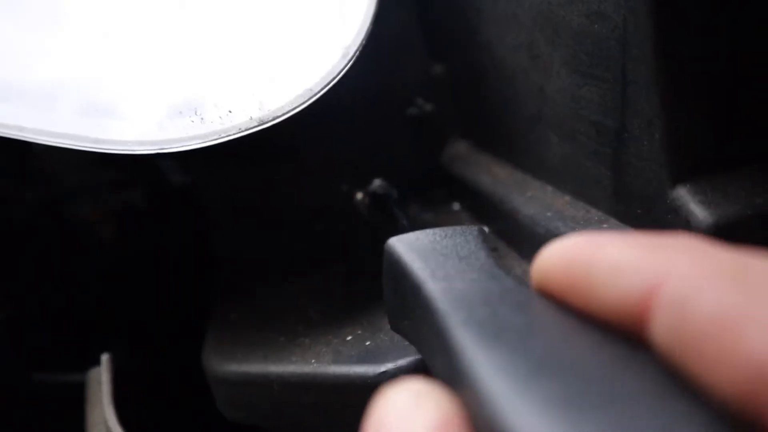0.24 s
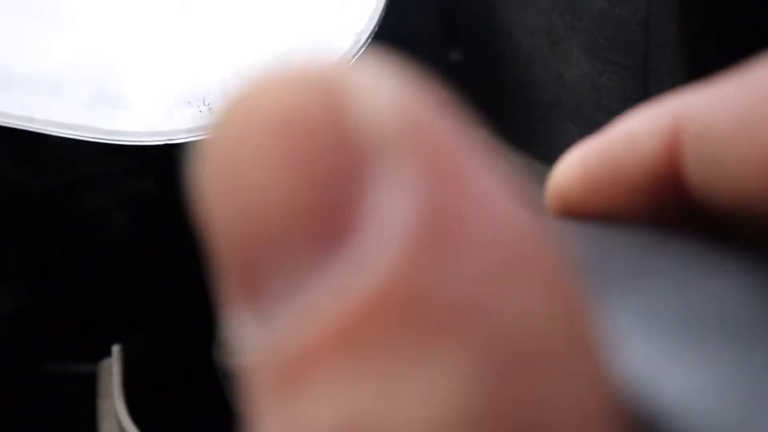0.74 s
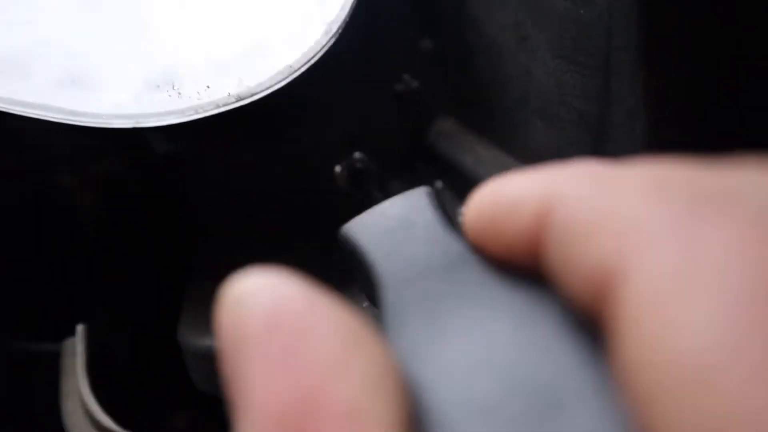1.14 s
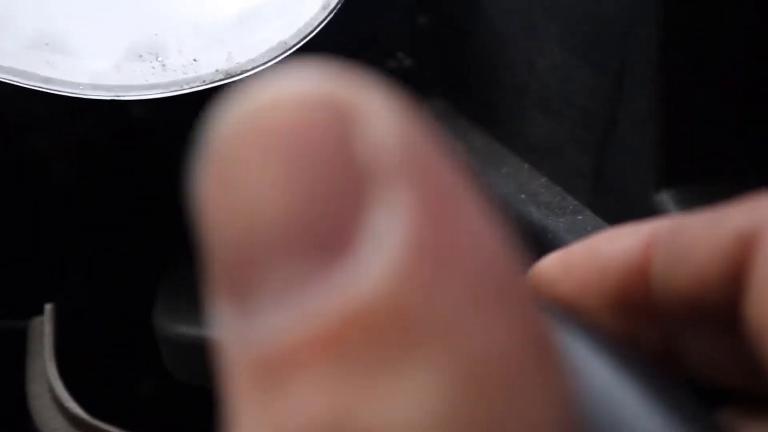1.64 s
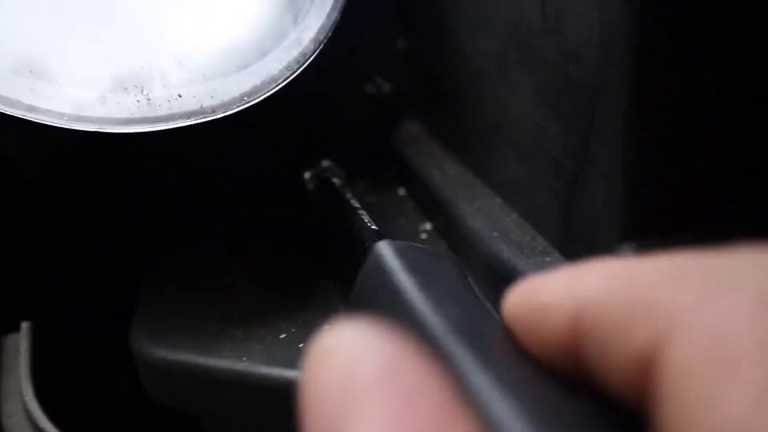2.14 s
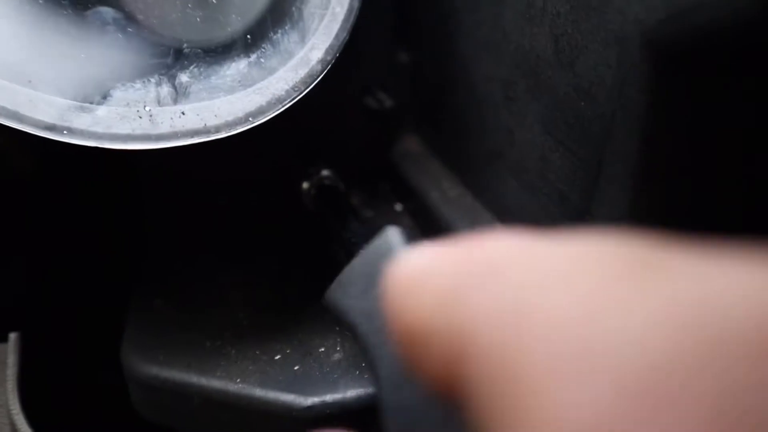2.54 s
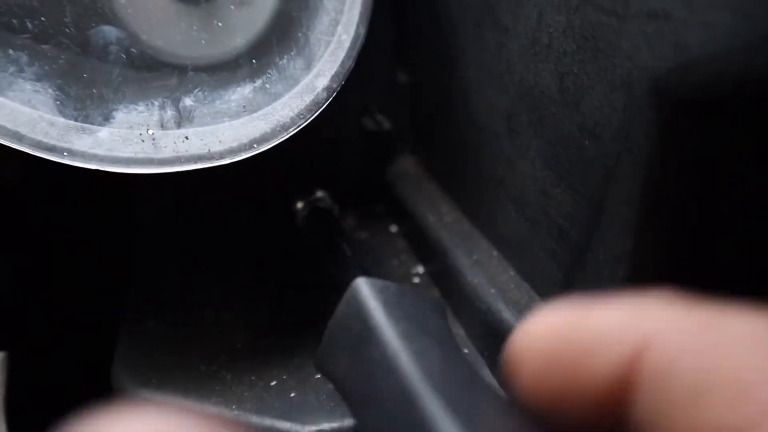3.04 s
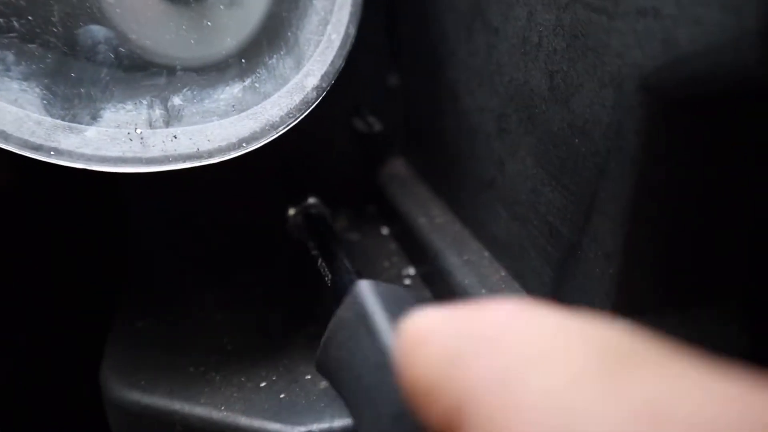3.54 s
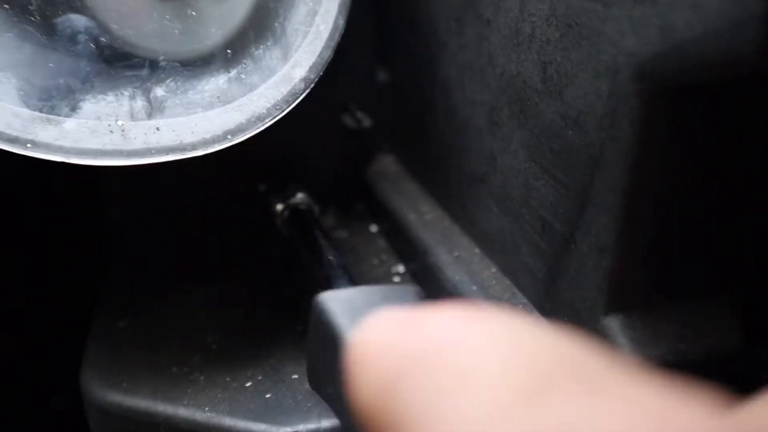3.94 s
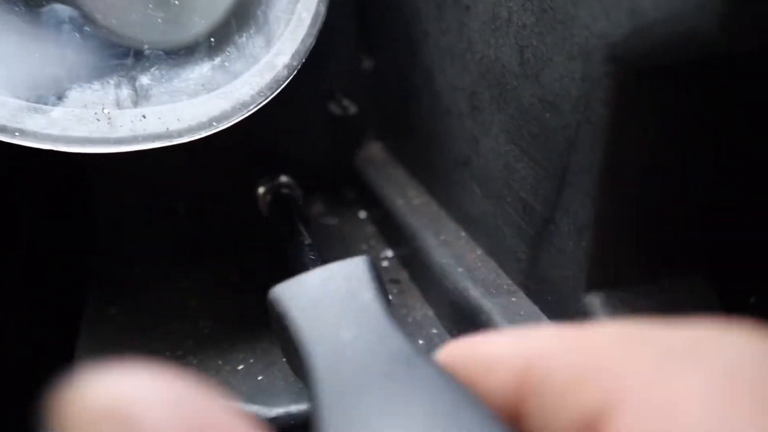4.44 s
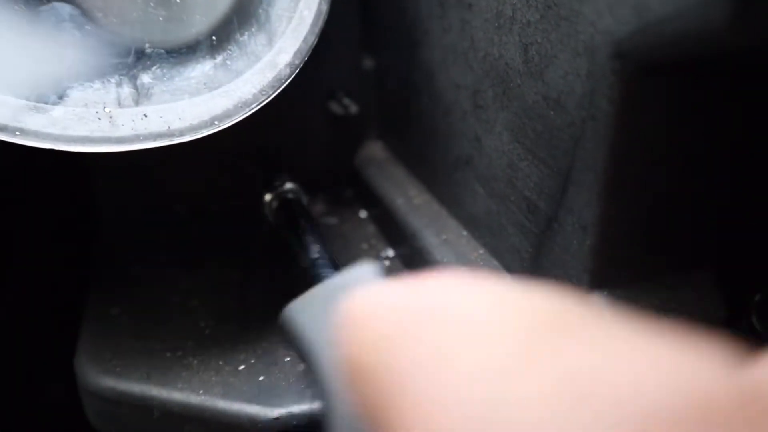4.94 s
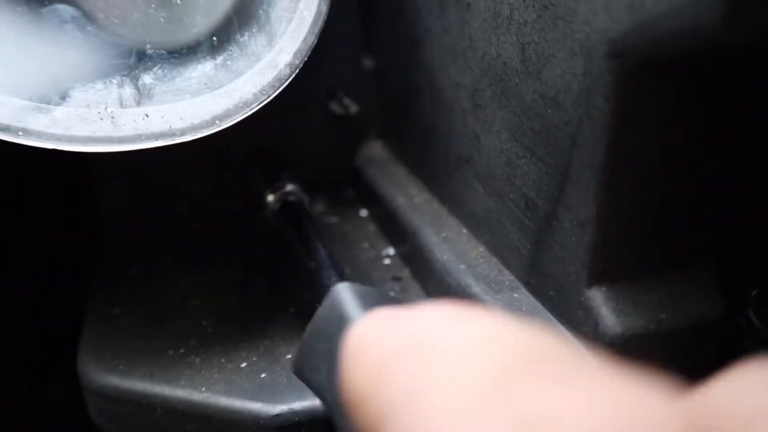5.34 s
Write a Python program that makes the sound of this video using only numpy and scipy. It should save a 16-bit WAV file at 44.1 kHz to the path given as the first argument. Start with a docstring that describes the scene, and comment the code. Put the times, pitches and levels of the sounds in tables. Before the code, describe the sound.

A close, dry pickup inside a small upholstered cabin, with very quiet low-weighted air noise. At 0.1 s a tight cluster of bright plastic snaps sounds, with a barely audible distant hum; another hard clack follows at 0.42 s. It is then nearly quiet until about 1.4 s, apart from soft handling booms and faint gliding bird whistles around 2 kHz, lasting from 1 to 1.7 s. Knocks resume at 1.5 s, with a hollow microphone thump around 1.6 s and a strong, duller clack at 1.97 s. From 2.1 to 4.9 s small clusters of ticks and knocks come several times a second, mixed with short scrapes and woody rubs, notably at 2.44 s. Rumbling grip bumps swell near 2.3 and 4.3 s. A brief scrape at 4.85 s leads to the loudest, sharpest double crack at 4.94-4.97 s. Afterwards only light taps, a little rubbing and low rumble remain until 5.5 s.

```python
"""Prying plastic trim in a parked vehicle

A hand tool works at plastic trim: clips snap, the tool knocks and drags on the panel.
Each blow is a short chatter of contacts ringing the panel's modes, plus a bright crack of filtered grit.
Drag strokes scrape and rub the same panel; handling thumps the microphone with rumble and boom.
A harmonic hum and whistled bird notes come in from outside, over a bed of shaped noise."""
import sys
import numpy as np
from scipy import signal
from scipy.fft import rfft, irfft
from scipy.io import wavfile

SR = 44100
rng = np.random.default_rng(int(sys.argv[2]) if len(sys.argv) > 2 else 0)


def to_wav(s):
    """Save 16-bit WAV."""
    ch = np.atleast_2d(s).T  # columns
    pcm = np.round(np.clip(ch, -1, 1) * 32767)  # PCM
    wavfile.write(sys.argv[1], SR, pcm.astype(np.int16))


N = 247401

# blows on the trim: (time [s], relative level [dB], hardness [dB]); hardness 0 a sharp tick, -20 a soft push
TRIM_BLOWS = [(0.094, -26, -0.5), (0.114, -30.5, -2.5), (0.119, -32.5, -1), (0.399, -53, -12),
              (0.414, -30, -9.5), (0.43, -22.5, -1), (0.57, -49, -10.5), (0.628, -53.5, -23.5),
              (1.114, -55.5, -15), (1.294, -64.5, -6), (1.456, -43.5, -7), (1.48, -41.5, -5),
              (1.492, -37.5, -7.5), (1.517, -29.5, -16), (1.626, -49.5, -16), (1.642, -47, -15),
              (1.705, -37.5, -7), (1.727, -43, -3.5), (1.923, -56, -7), (1.936, -34, -6), (1.951, -36, -16),
              (1.975, -22.5, -8.5), (2.017, -53, -5.5), (2.077, -46.5, -8.5), (2.098, -34.5, -6),
              (2.162, -40.5, -5), (2.288, -33, -3), (2.297, -32, 0), (2.312, -32, -4), (2.445, -37.5, -9),
              (2.47, -39, -7.5), (2.62, -41, -3.5), (2.628, -40.5, -7), (2.639, -35, -2), (2.772, -36, -1),
              (2.851, -32.5, -8.5), (2.939, -37, -9.5), (2.953, -42, -7.5), (2.968, -35.5, -4.5),
              (2.993, -33, -6), (3.112, -40.5, -0.5), (3.125, -39.5, -2.5), (3.296, -37, -3.5),
              (3.312, -33, -6.5), (3.442, -45, -7), (3.468, -58, -17), (3.51, -42.5, -1.5),
              (3.624, -53, -10.5), (3.643, -40, -10.5), (3.654, -39, 0), (3.694, -35, -4),
              (3.771, -41, -2.5), (3.791, -38, -7.5), (3.978, -40.5, -2), (4.008, -44, -1),
              (4.017, -36.5, -1.5), (4.042, -45.5, -23), (4.126, -42.5, 2), (4.165, -39, -1.5),
              (4.19, -44, -18), (4.283, -46.5, -15), (4.298, -45, -15), (4.326, -46.5, -5.5),
              (4.46, -42, -18), (4.468, -38.5, -3), (4.578, -45.5, -1), (4.614, -44.5, -11.5),
              (4.664, -44.5, -19), (4.68, -50, -7.5), (4.7, -40.5, -5), (4.704, -42, -2),
              (4.716, -43, -2.5), (4.73, -37, -27), (4.798, -61.5, 0.5), (4.827, -45.5, -10),
              (4.846, -37.5, -2), (4.856, -38, -6.5), (4.876, -40.5, -5.5), (4.94, -23, 3),
              (4.952, -30.5, -1), (4.9639, -20.5, 1.5), (5.045, -50.5, 0), (5.054, -42, -0.5),
              (5.252, -54.5, -8.5), (5.263, -40.5, -5), (5.311, -59, 5), (5.469, -55.5, -18.5),
              (5.502, -58, 2), (5.515, -47.5, 2)]
BLOW_TIMES_S = np.array(TRIM_BLOWS)[:, 0]
CONTACT_RISE_S, THUD_T60_S, KNOCK_T60_S, CRACK_T60_S = 0.0012, 0.035, 0.042, 0.031


def amp(db):
    """dB to gain."""
    return 10 ** (np.asarray(db) / 20)


def rms_one(x):
    """Scale to rms 1."""
    return x / np.sqrt(np.mean(x ** 2) + 1e-20)


def in_time(rows):
    """Columns of a curve table, one value a sample."""
    s, *columns = np.transpose(rows)
    return [np.interp(np.arange(N) / SR, s, c) for c in columns]


def coloured(x, spectrum):
    """Minimum-phase filter from (Hz, dB) points, unit power gain on white noise."""
    hz, level_db = np.transpose(spectrum)
    grid_hz = np.linspace(1, SR / 2, 4097)
    gain = amp(np.interp(np.log(grid_hz), np.log(hz), level_db))
    cepstrum = irfft(np.log(gain / np.sqrt(np.mean(gain ** 2))))
    # fold onto positive time: minimum phase
    cepstrum[1:4096] *= 2
    cepstrum[4097:] = 0
    impulse = irfft(np.exp(rfft(cepstrum)))
    return signal.fftconvolve(x, impulse)[:N]


def low_pass(x, hz):
    """Fourth-order low-pass."""
    return signal.sosfilt(signal.butter(4, hz, fs=SR, output="sos"), x)


def resonance(x, hz, width_hz):
    """Two-pole band-pass with gain 1 on top."""
    r = np.exp(-np.pi * width_hz / SR)
    b = np.array([1, 0, -1]) * (1 - r * r) / 2
    a = [1, -2 * r * np.cos(2 * np.pi * hz / SR), r * r]
    return signal.lfilter(b, a, x)


def grit(per_s, spread_db):
    """Random contacts of uneven size and sign; rms 1."""
    sizes = amp(spread_db * np.minimum(rng.exponential(1, N), 4)) * rng.choice([-1, 1], N)
    return rms_one(sizes * (rng.random(N) < per_s / SR))


def swells(rows, rise_share):
    """One envelope for each dB column: bell-shaped swells, rise / fall = rise_share, -14 dB at each end."""
    t = np.arange(N) / SR
    out = np.zeros((len(rows[0]) - 2, N))
    for s, half, *levels_db in rows:
        rise, fall = half * np.sqrt(rise_share), half / np.sqrt(rise_share)
        near = slice(max(round((s - 3 * rise) * SR), 0), round((s + 3 * fall) * SR))
        bell_db = -14.0 * ((t[near] - s) / np.where(t[near] < s, rise, fall)) ** 2
        out[:, near] += amp(np.add.outer(levels_db, bell_db))
    return out


def air():
    """Steady noise bed, strongest in the lows."""
    # (frequency [Hz], relative density [dB])
    air_curve = [(12, -22.5), (20, 13.5), (51, -30), (174, -8), (500, -14.5), (1500, -23.5), (2500, -28),
                 (6000, -36), (12500, -39.5), (14000, -64.5)]
    rms_db = -68.5
    return amp(rms_db) * coloured(rng.standard_normal(N), air_curve)


def hum():
    """Faint far harmonic tone: it swells briefly, fades, and ends lower in pitch."""
    # (time [s], fundamental [Hz], relative level [dB])
    hum_course = [(0, 149.8, -79), (.2, 146.5, -68), (.33, 148.6, -77), (.42, 142, -97)]
    # (multiple of the fundamental [1], relative level [dB])
    hum_orders = [(1, -3), (2, -5), (3, 0), (4, -10), (6, -3), (12, -20)]
    hz, level_db = in_time(hum_course)
    phase = 2 * np.pi * np.cumsum(hz) / SR
    harmonics = sum(amp(db) * np.sin(k * phase + k * k) for k, db in hum_orders)
    return amp(level_db) * harmonics


def handling():
    """Grip changes shake the microphone: lumpy rumble and a hollow boom."""
    # (peak time [s], mean of rise and fall [s], rumble level [dB], boom level [dB])
    grip_changes = [(.15, 0.056, -79, -56.5), (.5, 0.088, -76.5, -59), (.72, 0.18, -67, -66),
                    (1.11, 0.075, -61, -56), (1.5, 0.052, -55.5, -50), (1.63, 0.061, -57, -42),
                    (1.76, 0.022, -56, -58.5), (2.1, 0.097, -60, -48), (2.32, 0.17, -52, -66),
                    (3.01, 0.12, -63, -65), (3.88, 0.16, -56.5, -72), (4.24, 0.091, -59, -51),
                    (4.315, 0.046, -48.5, -48), (4.4, 0.15, -53.5, -64), (4.98, 0.028, -46, -76),
                    (5.1, 0.12, -55, -61), (5.3, .09, -54, -62.5)]
    grip_rumble_db, grip_boom_db = -66.5, -85   # the hand never holds quite still
    boom_hz, boom_width_hz = 112, 26
    bump, thump = swells(grip_changes, rise_share=1.6)
    rumble_band = signal.butter(2, [14, 65], "band", fs=SR, output="sos")
    rumble = signal.sosfilt(rumble_band, rng.standard_normal(N))
    boom = low_pass(resonance(grit(790, 3.7), boom_hz, boom_width_hz), 220)
    rumble_gain = bump + amp(grip_rumble_db)
    boom_gain = thump + amp(grip_boom_db)
    return rumble_gain * rms_one(rumble) + boom_gain * rms_one(boom)


def chatter(levels_db, rise_s, t60_s):
    """Envelope of all blows: a quick rise, then the contacts die away."""
    out = np.full(N + SR, 1e-9)
    t = np.arange(SR // 8) / SR
    shape = amp(-60 * t / t60_s) * np.minimum(t / rise_s, 1)
    for s, level_db in zip(BLOW_TIMES_S, levels_db):
        out[round(s * SR):][:len(t)] += amp(level_db) * shape
    return out[:N]


def pushes(levels_db):
    """One firm push near the start of each blow: a single click."""
    push_db, push_lag_s = 16, .002   # dB added to the blow level
    out = np.zeros(N)
    out[((BLOW_TIMES_S + push_lag_s) * SR).astype(int)] = -amp(levels_db + push_db)
    return out


def rattles():
    """Uneven gain of the drag: the tool sticks and slips, and small contacts flare and die in a few ms."""
    rattles_per_s, rattle_db = 53, -3.5
    slip_db = 1.8 * rms_one(low_pass(rng.standard_normal(N), 120))
    decay = amp(-60 / (THUD_T60_S * SR))   # per sample
    flares = rms_one(signal.lfilter([1], [1, -decay], np.abs(grit(rattles_per_s, 3.4))))
    return amp(slip_db) * (1.2 + amp(rattle_db) * flares)


def panel(modes, force, push, rub, spread_db, tilt_db):
    """Blows and rubbing ring the modes; every blow lands elsewhere, so mode strengths change."""
    hand_damping_hz = 15   # the hand on the panel widens every mode
    latest_blow = np.maximum(np.searchsorted(BLOW_TIMES_S * SR, np.arange(N), "right") - 1, 0)
    octaves = np.log2(np.array(modes)[:, 0])
    place_db = spread_db * rng.normal(0, 1, (len(TRIM_BLOWS), len(modes)))
    place_db = place_db + np.outer(tilt_db, octaves - octaves.mean())
    contacts = grit(6000, 0.81), grit(6000, 4.5)   # neighbouring modes take turns
    out = np.zeros(N)
    for k, (hz, bare_width_hz, level_db) in enumerate(modes):
        width_hz = bare_width_hz + hand_damping_hz
        touch = contacts[k % 2]
        drive = (force * touch + push) * amp(place_db[latest_blow, k]) + rub * touch
        # the width factor evens out mode power under noise-like drive
        gain = (-1) ** k * amp(level_db) / np.sqrt(width_hz / SR)
        out += gain * resonance(drive, hz, width_hz)
    return out


def trim():
    """Thud and knock of the panel, the bright crack of each contact, and the tool's drag."""
    # panel modes: (frequency [Hz], width without the hand [Hz], relative level [dB])
    low_modes = [(187, 4.8, -5), (206, 13, 2.5), (238.8, 7.2, 4), (291, 55, 3), (384.3, 15, 5),
                 (483.3, 10, 2), (553, 28, 3), (703.5, 120, -1), (781, 16, -7), (870, 23, -4),
                 (954.4, 26, 1.5), (1113.6, 13, -3), (1160, 8.4, -10.5), (1449, 23, -21.5)]
    high_modes = [(1530, 110, -17), (2080, 160, -8.5), (2120, 190, 4), (2548, 160, 2.5), (3093, 310, 5),
                  (3666, 110, 0), (4050, 400, -7.5), (5290, 350, -11), (5600, 120, -7), (6050, 350, -23)]
    # noise colours: (frequency [Hz], relative density [dB])
    crack_curve = [(1500, -18), (3000, -12), (5000, 7), (7500, -3), (10000, 0), (13000, -5), (15300, -9),
                   (16500, -13)]
    scrape_curve = [(900, -18), (1500, -19), (2100, -5.5), (3500, -5.5), (5800, -4), (6500, -17),
                    (7500, -11.5), (10000, -10), (13500, -15), (15500, -13.5), (16500, -27)]
    # tool strokes: (peak time [s], mean of rise and fall [s], relative scrape level [dB], relative rub level [dB])
    strokes = [(0.36, 0.043, -109, -67), (1.555, 0.11, -75, -60), (1.695, 0.016, -73, -60.5),
               (1.8, 0.039, -59.5, -58), (2.035, 0.061, -79, -56), (2.11, 0.029, -65, -51.5),
               (2.165, 0.038, -59, -62), (2.442, 0.01, -60.5, -41.5), (2.518, .041, -59, -61),
               (2.68, .1, -79.5, -62), (2.848, 0.03, -58, -53), (2.97, 0.025, -70, -48),
               (3.171, 0.065, -64, -58.5), (3.35, 0.064, -79, -61), (3.515, 0.063, -67.5, -60.5),
               (3.838, 0.025, -59, -57.5), (3.885, .03, -69.5, -60.5), (4.18, 0.047, -62.5, -53),
               (4.23, 0.025, -65, -61), (4.32, .092, -76, -60), (4.505, 0.048, -66.5, -60),
               (4.59, 0.039, -64, -57), (4.725, 0.06, -79, -56), (4.85, 0.014, -49.5, -58),
               (4.925, 0.031, -61.5, -55.5), (5.055, 0.039, -72, -51), (5.325, 0.046, -65, -60),
               (5.471, 0.024, -74.5, -60), (5.511, 0.024, -68.5, -49)]
    thud_top_hz, panel_top_hz = 1670, 6050
    knock_db, crack_db, crack_db_per_hardness_db = -15, 0, 2.24   # crack grows faster with hardness
    thud_tilt, knock_tilt = 1, 0.12   # dB per octave for each dB of hardness
    tilt_flat_db = -7.5   # hardness with no tilt

    _, level_db, hard_db = np.transpose(TRIM_BLOWS)
    scrape, rub = swells(strokes, rise_share=1.1) * amp(-4.5) * rattles()
    # a hard contact favours the upper modes of each set
    thud_tilt_db = np.clip(thud_tilt * (hard_db - tilt_flat_db), -4, 4)
    knock_tilt_db = np.clip(knock_tilt * (hard_db - tilt_flat_db), -4, 4)

    thuds = amp(-5) * chatter(level_db, CONTACT_RISE_S, THUD_T60_S)
    thud = amp(-10) * panel(low_modes, thuds, pushes(level_db), amp(-5.5) * rub,
                            spread_db=2.8, tilt_db=thud_tilt_db)
    knocks = chatter(level_db + hard_db, CONTACT_RISE_S, KNOCK_T60_S)
    knock = amp(knock_db) * panel(high_modes, knocks, 0, amp(-1.5) * scrape,
                                  spread_db=3.0, tilt_db=knock_tilt_db)
    cracks = chatter(level_db + crack_db_per_hardness_db * hard_db, CONTACT_RISE_S, CRACK_T60_S)
    crack = amp(crack_db) * coloured(cracks * grit(9000, 4.0), crack_curve)
    drag = coloured(scrape * grit(16000, 2.5), scrape_curve)
    # each set of modes radiates little above its top
    body = low_pass(thud, thud_top_hz) + low_pass(knock, panel_top_hz)
    return body + crack + drag


def bird():
    """Thin whistled notes: gliding sines whose pitch warbles fast and at random, blurring some."""
    # (start [s], end [s], start pitch [Hz], end pitch [Hz], relative level [dB], rms warble [Hz])
    notes = [(0.971, 1.191, 2088, 1843, -70, 31), (1.172, 1.277, 1950, 1930, -81, 38),
             (1.26, 1.35, 2750, 2850, -75.5, 14), (1.32, 1.423, 2370, 2240, -69.5, 150),
             (1.528, 1.601, 2350, 2300, -65.5, 104), (1.585, 1.636, 2100, 2050, -66.5, 50),
             (1.637, 1.738, 2630, 2750, -71, 14)]
    out = np.zeros(N)
    shake = rms_one(signal.lfilter(*signal.butter(2, 300, fs=SR), rng.standard_normal(N)))
    for start_s, end_s, start_hz, end_hz, level_db, warble_hz in notes:
        note = slice(round(start_s * SR), round(end_s * SR))
        hz = np.linspace(start_hz, end_hz, note.stop - note.start) + warble_hz * shake[note]
        whistle = np.sin(2 * np.pi * np.cumsum(hz) / SR)
        out[note] += amp(level_db) * signal.windows.tukey(len(hz), .4) * whistle
    return out


def cabin(x):
    """Small upholstered space: a short dull tail of dense reflections."""
    t60_s, build_up_s, tail_db, upholstery_hz = 0.061, 0.027, -20.5, 2230
    t = np.arange(SR // 4) / SR
    tail = rng.standard_normal(len(t)) * amp(-60 * t / t60_s) * np.minimum(t / build_up_s, 1)
    tail = signal.lfilter(*signal.butter(1, upholstery_hz, fs=SR), tail)
    tail /= np.sqrt(np.sum(tail ** 2))
    return x + amp(tail_db) * signal.fftconvolve(x, tail)[:N]


def scene():
    """Everything at one microphone; handling and air bypass the cabin's tail."""
    in_cabin = cabin(trim() + bird() + hum())
    return (in_cabin + handling() + air())[None]


def record(dry):
    """The top is cut steeply: 70 dB down from stop_hz up."""
    stop_hz = 16900
    return signal.sosfilt(signal.cheby2(12, 70, stop_hz, fs=SR, output="sos"), dry)


dry = scene()
out = record(dry)
to_wav(out)
```